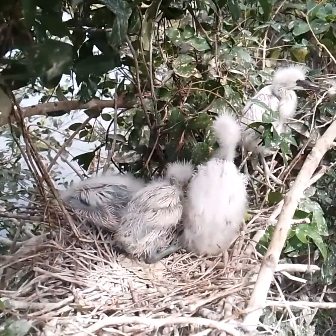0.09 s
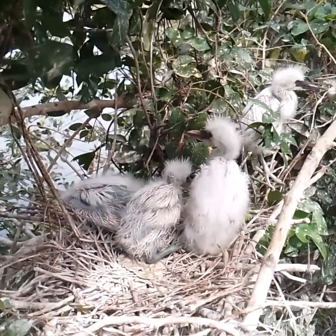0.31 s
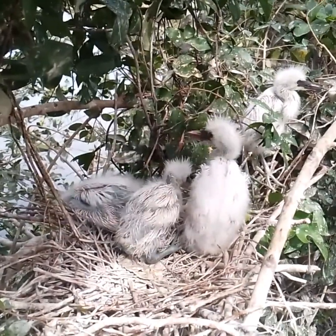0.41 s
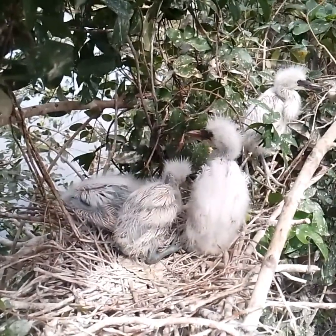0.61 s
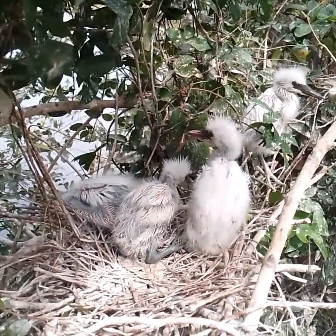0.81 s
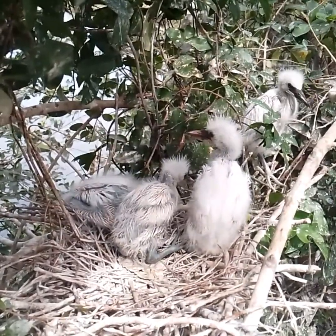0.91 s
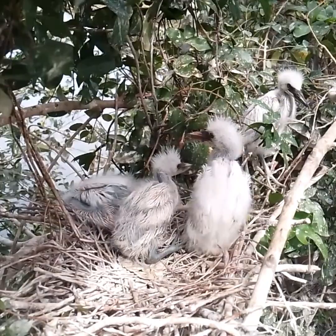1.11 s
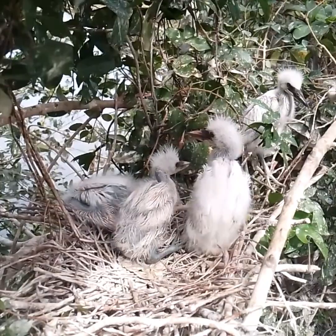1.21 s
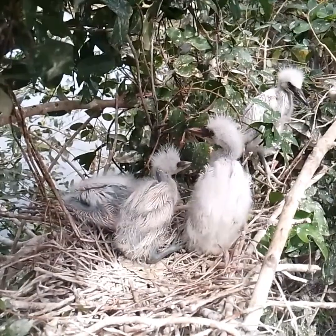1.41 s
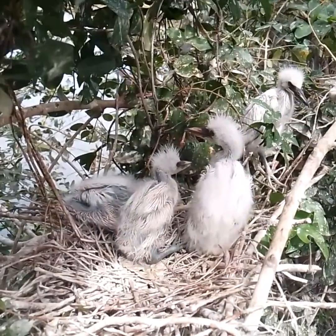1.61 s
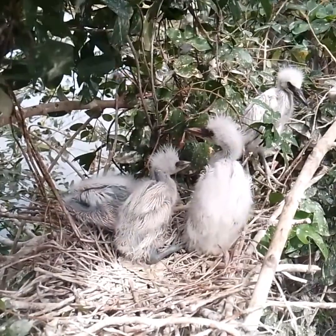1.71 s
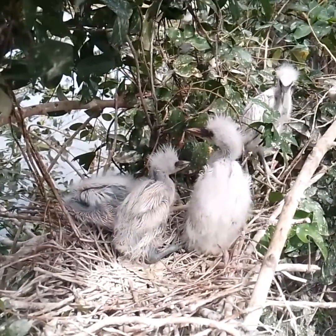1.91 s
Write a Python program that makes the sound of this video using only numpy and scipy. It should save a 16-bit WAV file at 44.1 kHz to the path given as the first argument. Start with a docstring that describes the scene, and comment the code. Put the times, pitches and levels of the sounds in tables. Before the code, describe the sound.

Wading bird chicks rasp and squawk in a leafy nest. A short dry call opens, a hoarse squawk swells at 0.2-0.3 s, a sharp burst hits at 0.42 s, and the loudest rough squawk runs 0.55-0.75 s. Fainter scratchy calls follow, clearer near 1.3 and 1.62 s, with faint low croaks and thin whistles. Crisp rustle weakens after 0.8 s over soft hum and hiss.

```python
"""Wading bird chicks rasp and squawk in a leafy nest: turbulent breath, chopped into puffs, excites the
resonances of a short windpipe and an open throat. Thin whistles are gliding tones with an octave partial;
low croaks are resonant noise. Twigs and leaves rustle as dense random impulses, and short echoes off the
foliage ripple the calls and the rustle. A far outdoor hum, alike at both ports in the bass, lies beneath.
Two microphone ports each add their own strong treble resonance and a hiss."""
import sys
import numpy as np
from scipy import signal
from scipy.fft import rfft, irfft, next_fast_len
from scipy.io import wavfile

SR = 44100
rng = np.random.default_rng(int(sys.argv[2]) if len(sys.argv) > 2 else 0)


def unload_wav(signal):
    """Save mono or channel-first audio to the path in sys.argv[1] as 16-bit WAV at rate SR, clipped to [-1, 1]."""
    wavfile.write(
        sys.argv[1],
        SR,
        np.round(np.clip(np.atleast_2d(signal).T, -1, 1) * 32767).astype(np.int16),
    )


N = 85995  # length [samples]

# Breath effort of each long squawk: (time [s], level [dB])
SQUAWK_EFFORT = [
    [(.13, -80), (.166, -53), (.186, -54.5), (.208, -43.5), (.258, -36.5), (.3, -41), (.315, -50),
     (.35, -60)],
    [(.535, -71), (.55, -44.5), (.568, -31.5), (.582, -34), (.605, -36.5), (.61, -30.5), (.64, -34),
     (.656, -30.5), (.661, -31.5), (.685, -29), (.7, -31), (.723, -30.5), (.733, -37), (.8, -61)],
]
# Windpipe of each long squawk: (resonance spacing [Hz], echo strength [0-1])
SQUAWK_PIPE = [(1880, .4), (1047, .55)]
# Throat and radiation of each long squawk: (throat [Hz], throat width [Hz], throat gain [dB],
# tilt [dB per octave], left-right [dB], left lag [samples], low cut [Hz])
SQUAWK_COLOUR = [(3640, 230, 10.4, 0.011, 0, 6.44, 2470), (2800, 140, 1.87, 0.5, 0.017, 3.73, 2670)]
# Short calls: (time [s], attack [s], hold [s], release per 20 dB [s], level before CALL_TRIM_DB [dB],
# windpipe spacing [Hz], echo strength [0-1], then the same columns as SQUAWK_COLOUR)
SHORT_CALLS = [ (0, 0.00066, 0.0065, 0.032, -40.5, 1180, 0.058, 4220, 600, 12.5, 4, 6.5, 6.5, 2040),
               (.376, .001, .002, .003, -37, 1200, .1, 7700, 900, 5, 0, 8, 5, 5500),
               (0.422, 0.0027, 0.0062, 0.031, -24, 1300, 0.17, 6100, 900, 1, 9, -4.5, 18.5, 1890),
               (0.486, 0.0085, 0.0095, 0.017, -30.5, 1260, 0.08, 4040, 900, 3, 4.5, 1, 5.5, 2850),
               (0.798, 0.008, 0.013, 0.074, -46, 1270, 0.086, 3300, 900, 14.5, 4, 2, 3, 2600),
               (0.883, 0.066, 0.025, 0.03, -45, 1170, 0.19, 3380, 416, 48, 0, 6, 2, 2680),
               (1.003, 0.0041, 0.015, 0.057, -53, 1200, 0.27, 3520, 800, 14, -3, 2, 1.5, 2520),
               (1.046, 0.0062, 0.0071, 0.04, -43, 595, 0.17, 2430, 870, 9, 2, 5.5, -16, 1860),
               (1.205, 0.0026, 0.018, 0.037, -53, 1190, 0.42, 4260, 1960, 13, 0.5, -3.5, -13.5, 2010),
               (1.308, 0.0014, 0.02, 0.013, -35.5, 1420, 0.061, 2470, 1160, 9, 5.5, 1, -18, 1010),
               (1.151, 0.0018, 0.0028, 0.0074, -52, 1200, .1, 9400, 2000, 6, 14, -21, 20, 6000),
               (1.357, 0.0019, 0.0062, 0.0062, -41.5, 1190, 0.082, 1800, 900, 12, 8, -18.5, -5.5, 900),
               (1.431, 0.037, 0.0076, 0.13, -45, 885, 0.3, 3600, 536, 25.5, 5, -4, 5, 2420),
               (1.62, 0.0079, 0.0038, 0.024, -34.5, 720, 0.56, 3780, 700, 5.5, 5, 1.5, -12.5, 1750),
               (1.657, 0.003, 0.012, 0.13, -55.5, 1130, 0.11, 3570, 497, 8, -4, 4.5, 8.5, 1870),
               (1.754, 0.004, 0.0084, 0.021, -44.5, 1302, 1, 5700, 1390, 40, 1, -3.5, 15.5, 3370),
               (1.846, 0.0084, 0.0069, 0.041, -40.5, 1300, 0.2, 3040, 600, 10, 6.5, 12.5, 19.5, 1750),
               (1.925, 0.0015, .008, .02, -53, 1200, 0.09, 5000, 900, -4, -1, 6, 21.5, 2380)]
CALL_TRIM_DB = -6.5
CALL_LIKENESS = .68  # share of breath power common to left and right
FLUTTER_DB, FLUTTER_HZ = 1, 56  # random level spread of the breath, and its rate
PIPE_CLEAR_HZ, PIPE_DULL_HZ = 4330, 8700  # the windpipe's resonances stand out between these
RASP_PER_S, RASP_DECAY_S, RASP_SHARE = 330, .0012, .3
SWELL_BEND = 1.6  # exponent of the attack

# Voiced strands: (time [s], attack [s], hold [s], release per 20 dB [s], level [dB],
# start [Hz], end [Hz], octave partial [dB], left-right [dB])
WHISTLES = [(.19, .015, .075, .012, -64, 1000, 790, -11, 0.5),
            (.908, .03, .038, .008, -59, 2370, 2410, -8, -8),
            (1.425, .02, .022, .01, -69, 2580, 2720, -12, -0.5),
            (1.47, .008, .018, .025, -60, 3580, 3480, -9, -1)]
WHISTLE_WOBBLE, WHISTLE_WOBBLE_HZ = .018, 90  # spread as a fraction of pitch, and its rate
WHISTLE_FLUTTER_DB = 3.5
# Low croaks: (time [s], attack [s], hold [s], release per 20 dB [s], level [dB],
# resonance [Hz], width [Hz], left-right [dB])
CROAKS = [(0.0022, 0.0004, 0.004, 0.046, -52, 1250, 350, 3),
          (0.115, 0.027, 0.023, 0.077, -50, 1173, 460, -0.5),
          (.421, 0.0039, 0.0032, 0.015, -56.5, 1050, 250, 0),
          (0.434, 0.0053, 0.0033, 0.03, -55.5, 880, 250, -0.5),
          (0.552, 0.0039, 0.14, 0.042, -64.5, 1234, 93, -0.5),
          (0.667, 0.0037, 0.041, 0.059, -60, 982, 88, -9),
          (1.31, 0.0063, 0.021, 0.0064, -69, 620, 200, 0.5),
          (.8, 0.044, 0.24, 0.091, -77.5, 818, 114, -1.5), (0.476, 0.033, 0.14, 0.36, -73, 254, 130, -10.5),
          (0.59, 0.04, 0.23, 0.21, -76.5, 292, 116, -7), (0.551, 0.0027, 0.16, 0.17, -70, 924, 250, 4.5)]
CROAK_LIKENESS = 0.66

# Leafy hiss before RUSTLE_TRIM_DB: (time [s], level [dB])
RUSTLE_LEVEL = [(0, -40.5), (0.103, -53), (0.161, -42.5), (.33, -42.5), (.41, -41.5), (.47, -34),
                (.53, -39.5), (.76, -39), (.89, -54), (1.03, -55), (1.17, -57.5), (1.29, -56),
                (1.34, -45.5), (1.45, -46), (1.56, -47), (1.6, -51), (1.7, -51.5), (1.75, -55.5),
                (1.802, -48.5), (1.84, -53)]
# Spectrum of the leafy hiss: (frequency [Hz], relative level [dB])
RUSTLE_COLOUR = [(100, -23), (600, -28.5), (1500, -21), (2500, -16.5), (4000, -16), (6000, -10.5),
                 (8000, -8.5), (11000, -1.5), (16000, -1)]
RUSTLE_TRIM_DB, RUSTLE_PAN_DB, RUSTLE_LIKENESS = -3, -1.5, 0.31
RUSTLE_GRAINS_PER_S, RUSTLE_GRAIN_DB = 5000, 3  # rate in each noise; scale of the random sizes
RUSTLE_WAVER_DB, RUSTLE_WAVER_HZ = 1.2, 15
LEAF_ECHO_S = (.001, .006)  # echoes off foliage: (shortest delay [s], longest delay [s])
LEAF_ECHO_GAIN = .26

# Spectrum of the far hum: (frequency [Hz], relative level per Hz [dB])
AIR_SPECTRUM = [(15, -49), (25, -20), (60, -1), (119, -13.5), (157, -18.5), (248, -5.5), (383, -5.5),
                (482, -5.5), (779, -3.5), (1230, -13), (2290, -14.5), (3310, -19.5), (3620, -7.5),
                (6000, -12.5), (7800, -10), (13200, -120)]
# Coherence of the hum between left and right: (frequency [Hz], likeness [-1 to 1])
AIR_LIKENESS = [(40, .96), (130, .9), (300, .7), (700, .2), (1500, 0)]
# Gain of the hum above AIR_MIDS_HZ: (time [s], level [dB])
AIR_MIDS = [(0, 5), (.5, 6), (1.0, 3.5), (1.3, -2), (1.95, -0.5)]
AIR_DB, AIR_MIDS_HZ = -73.5, 365  # AIR_DB is the level before AIR_MIDS acts

# Response of each microphone port: (frequency [Hz], gain [dB])
PORT_LEFT = [(2000, 6), (4000, 6.5), (5500, 8.5), (6800, 12.5), (7500, 18.5), (8000, 15), (8700, 4.5),
             (10000, -1), (12000, -17.5), (14500, -4), (15700, -22)]
PORT_RIGHT = [(2000, 5.5), (4000, 5), (5500, 4.5), (7000, -0.5), (8500, 7), (9600, 4.5), (10500, 13),
              (11200, 10), (12200, 0), (13500, -2.5), (14800, -16), (15600, -1), (16000, -20)]
# Port hiss gain, one row a port, left then right: (level [dB])
SELF_NOISE_DB = [
    [-71],
    [-66],
]
CUTOFF_HZ = 15970


def chicks():
    """Source and filter: long squawks follow the breath effort; short calls swell and die."""
    out = np.zeros((2, N))
    for effort, pipe, colour in zip(SQUAWK_EFFORT, SQUAWK_PIPE, SQUAWK_COLOUR):
        s, db = np.transpose(effort)
        t = np.arange(s[0], s[-1], 1 / SR)
        fade = np.clip(np.minimum(t - s[0], s[-1] - t) / .008, 0, 1)  # 8 ms at either end
        envelope = fade * from_db(np.interp(t, s, db))
        add(out, s[0], voice(envelope, *pipe, *colour))
    for s, attack, hold, release, db, *colour in SHORT_CALLS:
        envelope = swell(attack, hold, release, db + CALL_TRIM_DB)
        add(out, s, voice(envelope, *colour))
    return out


def voice(envelope, pipe_hz, ring, throat_hz, width_hz, throat_db, tilt_db, pan_db, lag, cut_hz):
    """Tube resonance: turbulent breath excites the windpipe's evenly spaced modes and the throat."""
    def tract(hz):
        dulling = 1 + (hz / PIPE_DULL_HZ) ** 4
        clearing = 1 + (PIPE_CLEAR_HZ / (hz + 1)) ** 6
        echo = np.clip(ring, 0, .9) / dulling / clearing
        pipe = 1 / (1 - echo * np.exp(-2j * np.pi * hz / pipe_hz))
        low_cut = 1 / np.sqrt(1 + (cut_hz / (hz + 1)) ** 14.0)
        slope = from_db(tilt_db * np.log2((hz + 1) / 5000))
        throat = 1 + (from_db(throat_db) - 1) * peak(hz, throat_hz, width_hz)
        return pipe * low_cut * slope * throat

    size = int(.3 * SR)
    turbulence = rng.standard_normal((3, size))
    puffs = turbulence * rasp(size)
    breath = puffs * from_db(FLUTTER_DB * drift(size, FLUTTER_HZ))
    call = rms_one(shaped(pair(breath, CALL_LIKENESS, lag), tract))
    return panned(call[:, :len(envelope)] * envelope[:size], pan_db)


def rasp(size):
    """Amplitude modulation: each uneven flap of the voice lets a dying puff of breath through."""
    flaps_per_sample = RASP_PER_S / SR * from_db(3 * drift(size, 100))
    flaps = np.diff(np.floor(np.cumsum(flaps_per_sample)), prepend=0)
    decay = np.exp(-1 / (RASP_DECAY_S * SR))
    gate = signal.lfilter([1], [1, -decay], flaps * rng.uniform(.3, 1, size))
    return 1 - RASP_SHARE + RASP_SHARE * rms_one(gate)


def whistles():
    """Harmonic synthesis: a wobbling, gliding tone with its octave partial."""
    out = np.zeros((2, N))
    for s, attack, hold, release, db, start_hz, end_hz, octave_db, pan_db in WHISTLES:
        envelope = swell(attack, hold, release, db)
        size = len(envelope)
        wobble = 1 + WHISTLE_WOBBLE * drift(SR, WHISTLE_WOBBLE_HZ)[:size]
        flutter = from_db(WHISTLE_FLUTTER_DB * drift(SR, FLUTTER_HZ)[:size])
        pitch_hz = np.linspace(start_hz, end_hz, size) * wobble
        phase = 2 * np.pi * np.cumsum(pitch_hz) / SR
        tone = (np.sin(phase) + from_db(octave_db) * np.sin(2 * phase)) * flutter
        add(out, s, panned(np.tile(tone * envelope, (2, 1)), pan_db))
    return out


def croaks():
    """Resonant filtering: hoarse noise passes twice through one low resonance."""
    def resonance(hz, centre_hz, width_hz):
        bass_cut = hz ** 2 / (hz ** 2 + 150 ** 2)
        return peak(hz, centre_hz, width_hz) ** 2 * bass_cut

    out = np.zeros((2, N))
    for s, attack, hold, release, db, centre_hz, width_hz, pan_db in CROAKS:
        noise = pair(rng.standard_normal((3, SR)), CROAK_LIKENESS, lag=11.5)
        envelope = swell(attack, hold, release, db)
        hoarse = rms_one(shaped(noise, lambda hz: resonance(hz, centre_hz, width_hz)))
        add(out, s, panned(hoarse[:, :len(envelope)] * envelope, pan_db))
    return out


def rustle():
    """Shot noise: dense random impulses of leaves and twigs, uneven in size, merge into a hiss."""
    sizes = from_db(RUSTLE_GRAIN_DB * np.minimum(rng.exponential(1, (3, N)), 5))
    signs = rng.choice([-1, 1], (3, N))
    grains = sizes * signs * (rng.random((3, N)) < RUSTLE_GRAINS_PER_S / SR)
    stereo = pair(grains, RUSTLE_LIKENESS, lag=-2.26)
    hiss = rms_one(shaped(stereo, lambda hz: from_db(at_hz(RUSTLE_COLOUR, hz))))
    level_db = np.interp(np.arange(N) / SR, *np.transpose(RUSTLE_LEVEL)) + RUSTLE_TRIM_DB
    waver_db = RUSTLE_WAVER_DB * drift(N, RUSTLE_WAVER_HZ)
    return panned(hiss * from_db(level_db + waver_db), RUSTLE_PAN_DB)


def leaves(x):
    """Comb interference: six short echoes a side off leaves and branches ripple the spectrum finely."""
    lags = rng.uniform(*LEAF_ECHO_S, (6, 2, 1))
    signs = rng.choice([-1, 1], (6, 2, 1))

    def ripple(hz):
        return 1 + LEAF_ECHO_GAIN * np.sum(signs * np.exp(-2j * np.pi * hz * lags), axis=0)

    return shaped(x, ripple) / np.sqrt(1 + 6 * LEAF_ECHO_GAIN ** 2)


def air():
    """Spatial coherence: a far hum, alike at both ports in the bass, with a slowly varying upper part."""
    def weight(hz, sign):
        likeness = np.clip(at_hz(AIR_LIKENESS, hz), -1, 1)
        return from_db(at_hz(AIR_SPECTRUM, hz)) * np.sqrt(1 + sign * likeness) * (hz > 15)

    mid, side = rng.standard_normal((2, N))
    mid = shaped(mid, lambda hz: weight(hz, 1))
    side = shaped(side, lambda hz: weight(hz, -1))
    hum = from_db(AIR_DB) * rms_one(np.array([mid + side, mid - side]))
    bass = shaped(hum, lambda hz: 1 / (1 + (hz / AIR_MIDS_HZ) ** 4))
    mids_gain = from_db(np.interp(np.arange(N) / SR, *np.transpose(AIR_MIDS)))
    return bass + (hum - bass) * mids_gain


def from_db(db):
    """Decibel law: 20 dB is a tenfold amplitude."""
    return 10 ** (np.asarray(db) / 20)


def rms_one(x):
    """Normalisation to unit root-mean-square amplitude."""
    return x / np.sqrt(np.mean(x ** 2) + 1e-20)


def at_hz(points, hz):
    """Interpolation of a (frequency [Hz], value) table on a logarithmic frequency axis."""
    table_hz, values = np.transpose(points)
    return np.interp(np.log(hz + 1), np.log(table_hz), values)


def shaped(x, response):
    """Linear filtering: the spectrum is multiplied by a function of frequency."""
    size = next_fast_len(x.shape[-1] + 512)
    spectrum = rfft(x, size) * response(np.fft.rfftfreq(size, 1 / SR))
    return irfft(spectrum, size)[..., :x.shape[-1]]


def peak(hz, centre_hz, width_hz):
    """Simple resonance with unit gain at its centre."""
    return 1 / (1 + 1j * (hz ** 2 - centre_hz ** 2) / (width_hz * (hz + 1)))


def drift(size, rate_hz):
    """Low-passed noise: slow random motion of unit rms."""
    r = np.exp(-2 * np.pi * rate_hz / SR)
    noise = rng.standard_normal(size + 2000)
    return rms_one(signal.lfilter([1], [1, -2 * r, r * r], noise)[2000:])  # skips the filter's start


def pair(three, likeness, lag):
    """Partial coherence: one shared noise, late on the left by lag samples, and two separate ones."""
    share = np.clip(likeness, 0, 1)
    sides = np.array([[1], [-1]])
    shared = shaped(three[0], lambda hz: np.exp(-1j * np.pi * hz * lag / SR * sides))
    return np.sqrt(share) * shared + np.sqrt(1 - share) * three[1:]


def panned(x, pan_db):
    """Level difference: half the decibels go to each side with opposite sign."""
    return x * from_db([[pan_db / 2], [-pan_db / 2]])


def swell(attack, hold, release, level_db):
    """Exponential decay: after attack and hold, the level falls 20 dB in each release time."""
    t = np.arange(int((attack + hold + 2 * release) * SR)) / SR
    rise = np.clip(t / max(attack, 1e-4), 0, 1) ** SWELL_BEND
    fall_db = 20 * np.maximum(t - attack - hold, 0) / release
    return rise * from_db(level_db - fall_db)


def add(out, s, sound):
    """Superposition of a sound starting at s seconds."""
    i = max(int(s * SR), 0)
    out[:, i:i + sound.shape[1]] += sound[:, :N - i]


def scene():
    """Superposition of all sources; the foliage echoes act on the calls and the rustle."""
    return leaves(chicks() + rustle()) + whistles() + croaks() + air()


def record(dry):
    """Port resonance: each port colours the sound and adds its hiss; the top is cut."""
    ports = shaped(dry, lambda hz: from_db([at_hz(PORT_LEFT, hz), at_hz(PORT_RIGHT, hz)]))
    hiss = shaped(rng.standard_normal((2, N)), lambda hz: 1 / (1 + (5000 / (hz + 1)) ** 2))
    ports = ports + from_db(SELF_NOISE_DB) * hiss
    top_cut = signal.ellip(14, .5, 65, CUTOFF_HZ, fs=SR, output="sos")
    return signal.sosfilt(top_cut, ports)


dry = scene()
out = record(dry)
unload_wav(out)
```